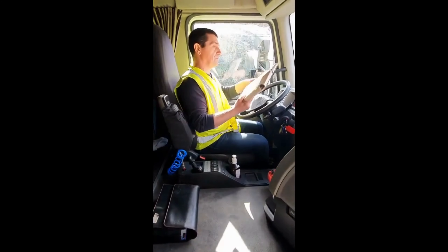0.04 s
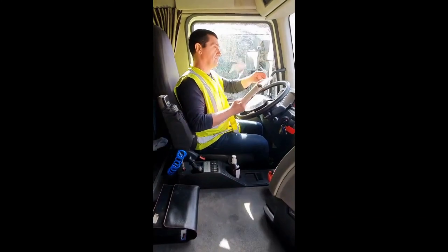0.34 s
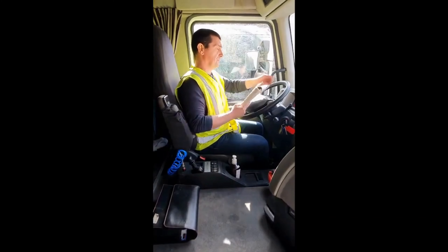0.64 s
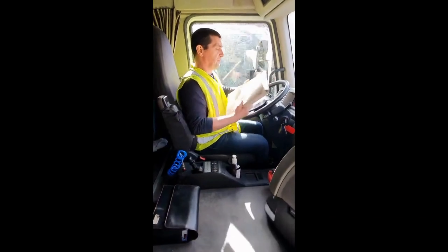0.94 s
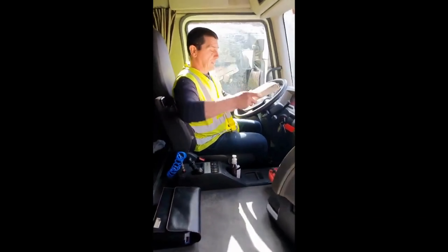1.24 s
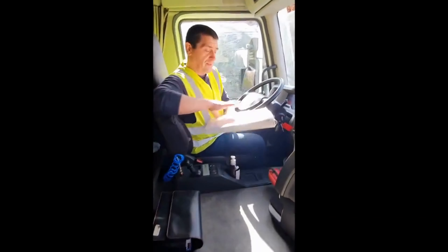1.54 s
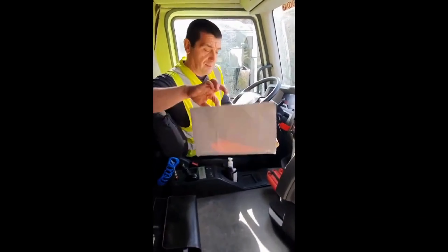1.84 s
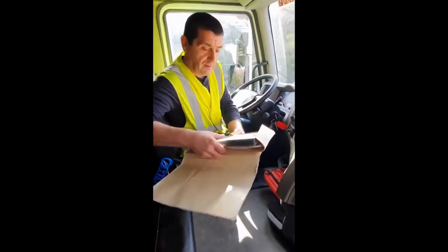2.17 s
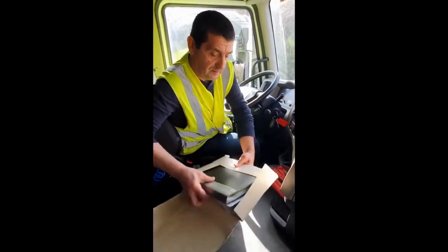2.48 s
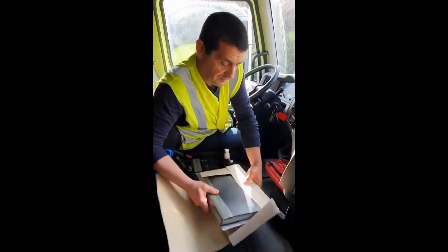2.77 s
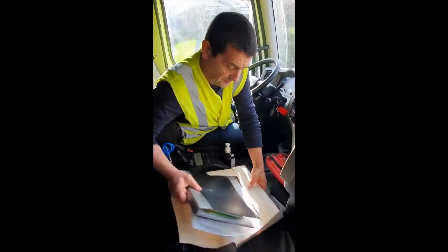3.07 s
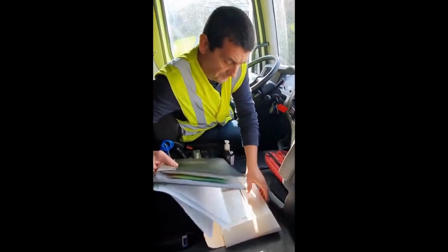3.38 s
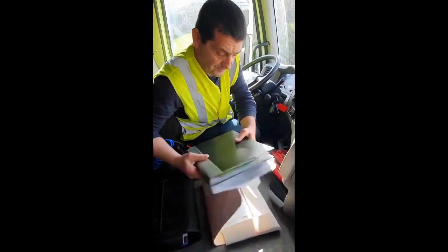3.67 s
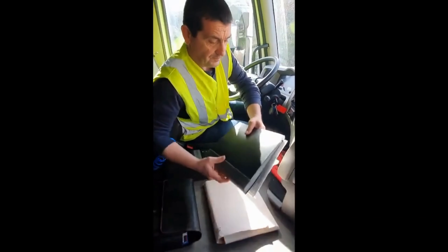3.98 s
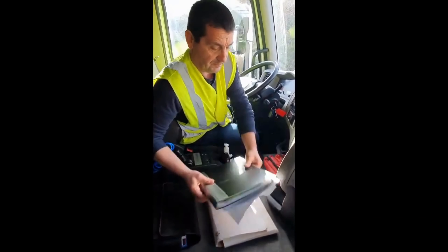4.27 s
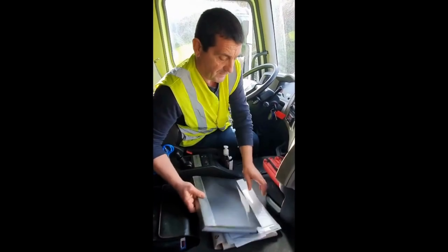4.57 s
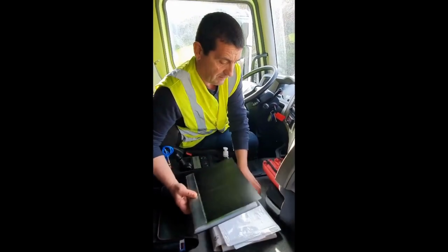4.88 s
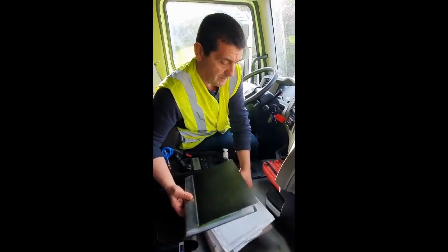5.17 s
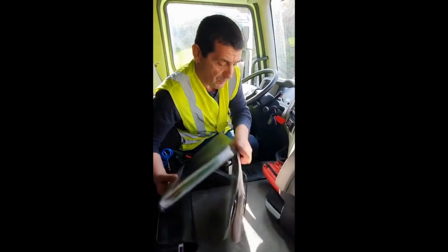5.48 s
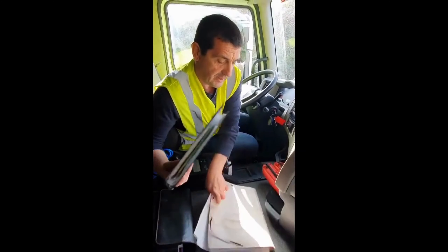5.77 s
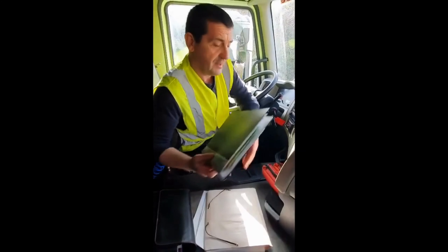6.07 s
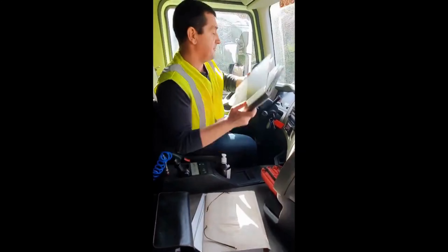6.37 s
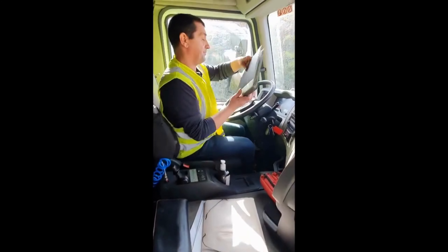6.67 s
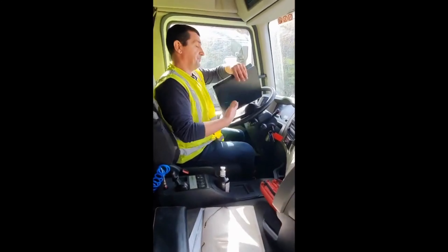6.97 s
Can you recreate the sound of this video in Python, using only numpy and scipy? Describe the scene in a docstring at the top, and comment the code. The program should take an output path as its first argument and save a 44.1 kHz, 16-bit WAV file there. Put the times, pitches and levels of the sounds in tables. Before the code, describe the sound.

Close handling of document folders in a quiet cab: paper rasps and flaps, plastic crackles, and covers slap down.

```python
"""Document folders of card, paper and plastic are handled in a parked truck cab. A card wallet is
unfolded, a binder is drawn out, the wallet is slapped down and the binder knocks the steering wheel.
Stick-slip friction makes the sheets rasp as they slide and flap, buckling makes the sleeves snap,
and impacts set covers and fittings ringing in their modes. Each swing of a folder displaces air
and stirs the low boom of the small, padded cab."""
import sys
import numpy as np
from scipy import signal
from scipy.fft import rfft, irfft, next_fast_len
from scipy.io import wavfile
from scipy.ndimage import uniform_filter1d, map_coordinates

SR = 44100
rng = np.random.default_rng(int(sys.argv[2]) if len(sys.argv) > 2 else 0)


def generate_wav(signal):
    """Clip the signal to [-1, 1] and save it as 16-bit WAV at the path in sys.argv[1]."""
    frames = np.transpose(np.atleast_2d(signal))
    scaled = np.clip(frames, -1, 1) * 32767
    pcm = np.round(scaled).astype(np.int16)
    wavfile.write(sys.argv[1], SR, pcm)


N = 318819
TIME = np.arange(N) / SR


def amp(db):
    """Decibels to gain."""
    return 10 ** (np.asarray(db) / 20)


def unit(x):
    """x at rms 1."""
    return x / np.sqrt(np.mean(x ** 2) + 1e-20)


def along(points, hz):
    """Interpolate (Hz, value) points on a log axis."""
    f, v = np.transpose(points)
    return np.interp(np.log(hz + 1), np.log(f + 1), v)


def curve(points):
    """Interpolate (seconds, value) points at every sample."""
    return np.interp(TIME, *np.transpose(points))


def wobble(rate):
    """A smooth random curve, rate knots a second."""
    return map_coordinates(rng.standard_normal(16384), [TIME * rate], mode="wrap")


def noise(length=N):
    """Two independent white noises."""
    return rng.standard_normal((2, length))


def filtered(x, response):
    """Multiply the spectrum of x by a frequency response."""
    size = next_fast_len(N + SR // 4)
    return irfft(rfft(x, size) * response(np.fft.rfftfreq(size, 1 / SR)), size)[..., :N]


# Each row: frequency in Hz, left-right correlation.
COHERENCE = [(100, 0.92), (300, 0.87), (650, 0.66), (1300, 0.3), (3200, 0.076), (5200, 0.12), (7000, 0.95),
             (15000, 0.91)]
def stereo(pair, spectrum):
    """Partial coherence: two signals are coloured and mixed, alike in the bass and the high treble."""
    angle = lambda hz: np.arccos(np.clip(along(COHERENCE, hz), -1, 1)) / 2
    mid, side = filtered(pair, lambda hz: amp(along(spectrum, hz)) * [np.cos(angle(hz)),
                                                                      np.sin(angle(hz))])
    return np.array([mid + side, mid - side])


# Each row: frequency in Hz, relative spectral density in dB.
BOOM_SPECTRUM = [(12, -53), (20, -32), (27, -33), (38, -2), (91, 5), (100, -8), (118, -7.5), (161, -22.5),
                 (300, -24.5), (390, -50), (660, -120)]
HUSH_SPECTRUM = [(100, -10), (200, 3.5), (400, 1), (800, -6.5), (3500, -1), (6000, -5), (15000, -21)]
# Each row: time of the peak in seconds, level in dB, half-length in seconds.
FOLDER_SWINGS = [(0, -51, 0.051), (0.756, -49, 0.025), (1.786, -46.5, 0.068), (2.27, -41, 0.098),
                 (3.24, -50, 0.21), (4.123, -52, 0.16), (4.42, -46.5, 0.061), (4.86, -43, 0.063),
                 (5.37, -50, 0.053), (5.862, -38, 0.078), (6.42, -43, 0.12), (7.05, -45, 0.077),
                 (7.22, -44, 0.029)]
def cab_air(idle_db=-57, hush_db=-76.5):
    """Air displacement: each swing of a folder swells the cab's low boom, over a faint hush."""
    swells = sum(amp(db) ** 2 * np.exp(-((TIME - s) / half) ** 2) for s, db, half in FOLDER_SWINGS)
    boom = unit(stereo(noise(), BOOM_SPECTRUM))
    hush = unit(stereo(noise(), HUSH_SPECTRUM))
    return np.sqrt(amp(idle_db) ** 2 + swells) * amp(2.1 * wobble(9)) * boom + amp(hush_db) * hush


# Each row: frequency in Hz, time to decay by 60 dB (t60) in seconds.
CAB_DECAY = [(100, 0.16), (500, 0.17), (3000, 0.11), (12000, 0.042)]
def cab_echo(x):
    """Reverberation: glass and dashboard reflect the sound at once, and the seats soon absorb it."""
    hz, t, bands = signal.stft(noise(SR // 3), SR, nperseg=256)
    tail = signal.istft(bands * amp(-60 * t / along(CAB_DECAY, hz)[:, None]), SR, nperseg=256)[1]
    tail = np.pad(tail, ((0, 0), (SR // 300, 0)))
    return signal.fftconvolve(x, tail / np.linalg.norm(tail[0]), axes=1)[:, :N]


# Each row: frequency in Hz, left minus right in dB for sheets at the wheel, then at the console.
BALANCE = [(250, -2, -1.5), (600, 1, 5), (2520, 0.5, 2.5), (4170, 2, 10.5), (6500, 0.5, 3), (8650, -2, -9),
           (10000, 0, 1.5), (11600, -1.5, -12), (14500, -1, 3.5)]
# Each row: frequency in Hz, phase lead of the left port in radians.
PHASE_LEAD = [(100, 0), (600, 0.7), (1200, 1.23), (2200, 3), (4500, 3), (5600, 0.9), (6500, 0)]
# Each row: time in seconds, position from 0 at the wheel to 1 at the console.
FOLDER_PATH = [(1.9, 0), (2.8, 0.82), (5.9, 0.86), (7.2, 0.93)]
def microphone_ports(x):
    """Localisation by phase and level: the left port leads, and the balance follows the folders."""
    sides, balance = np.array([[.5], [-.5]]), np.array(BALANCE)
    phase = lambda hz: np.exp(1j * sides * along(PHASE_LEAD, hz))
    heard = lambda points: filtered(x, lambda hz: amp(sides * along(points, hz)) * phase(hz))
    place = curve(FOLDER_PATH)
    return (1 - place) * heard(balance[:, :2]) + place * heard(balance[:, ::2])


# The plastic console and the wheel's rim. Each row: frequency in Hz, relative dB, free t60 in seconds.
CONSOLE_MODES = [(645, 7.5, 0.12), (775, 3, 0.18), (1090, -32, 0.14), (1140, -17, 0.14), (1286, -15, 0.31),
                 (1374, -4, 0.15), (1575, -5, 0.061)]
WHEEL_MODES = [(604, 7.5, 0.029), (726, 7.5, 0.04), (1770, -9, 0.12), (2310, -14, 0.089)]
def knock(modes, start_s, db, damping_per_s):
    """Damped modal vibration: a fitting is struck once, and the folder on it hastens the decay."""
    out, t = np.zeros(N + SR), np.arange(SR // 4) / SR
    for (hz, mode_db, t60), phase in zip(modes, 2 * np.pi * rng.random(len(modes))):
        envelope = amp(db + mode_db - 60 * t * (1 / t60 + damping_per_s))
        out[round(start_s * SR):][:len(t)] += envelope * np.sin(2 * np.pi * hz * t + phase)
    return out[:N]


def palm_thud(start_s=2.448, db=-19.5, hz=250, rise_s=0.00075, t60=0.012):
    """Heavy damping: the palm stops the binder dead, leaving one low pulse."""
    t = np.maximum(TIME - start_s, 0)
    envelope = amp(db - np.minimum(60 * t / t60, 200)) * (1 - np.exp(-t / rise_s))
    return envelope * np.sin(2 * np.pi * hz * t)


# Each row: multiple of the pitch, relative level in dB.
COVER_MODES = [(1, 1.5), (.74, -6.5), (1.24, -11), (1.82, -16), (2.42, -25.5)]
# Each row: start in seconds, level in dB, pitch in Hz, rise and t60 in seconds.
COVER_BUMPS = [(0.728, -25.5, 174, 0.002, 0.057), (.747, -26, 412, .0018, .045),
               (.889, -50, 2450, .001, 0.021), (0.889, -48.5, 262, 0.0013, 0.044),
               (0.972, -48, 261, .0015, .05), (1.465, -42, 860, .001, .03), (1.73, -40, 217, .003, 0.12),
               (1.752, -41, 700, .0033, .05), (1.794, -44, 1000, .003, .04), (2.345, -44, 805, .003, 0.043),
               (2.479, -33.5, 700, 0.0016, 0.053), (3.031, -34, 640, .003, .05),
               (3.071, -32, 1110, .0017, .035), (3.12, -30, 580, 0.0036, 0.053),
               (3.181, -34.5, 553, .001, 0.048), (3.193, -22, 1800, .0025, .03),
               (3.204, -34, 550, 0.0013, 0.02), (3.27, -29, 728, 0.0024, 0.042),
               (3.314, -27.5, 210, 0.0024, 0.11), (3.35, -28, 253, 0.0047, 0.11),
               (3.374, -27.5, 210, 0.0032, 0.12), (3.449, -38, 140, .003, .09),
               (3.931, -40, 333, 0.0014, 0.039), (4.464, -32.5, 208, 0.0015, 0.085),
               (4.481, -34, 543, .003, 0.053), (4.501, -29, 420, .002, 0.089),
               (4.512, -34.5, 260, .004, 0.12), (4.735, -23, 210, 0.0064, 0.097),
               (4.826, -31.5, 302, 0.0073, 0.1), (4.854, -25, 209, 0.0064, 0.081),
               (4.875, -30.5, 277, 0.0032, 0.11), (5.715, -33, 2700, .001, .023),
               (5.743, -20, 339, 0.0017, 0.1), (5.754, -31, 88, .0027, .1), (6.262, -47, 1130, .0018, .037),
               (6.3, -32.5, 185, 0.0025, 0.072), (6.329, -36.5, 328, 0.0036, 0.079),
               (6.354, -30, 260, 0.0031, 0.13), (6.355, -43, 1024, 0.0031, .04),
               (6.386, -19.5, 71, .0075, .14), (6.43, -36, 277, .0017, 0.08),
               (6.621, -44, 606, .003, 0.059), (6.711, -38.5, 577, 0.0028, 0.068),
               (6.997, -13.5, 317, 0.0017, 0.06), (7.019, -30, 247, .008, .08),
               (7.211, -29.5, 280, 0.0047, 0.11)]
def cover_bumps(flex_share=0.13, softness_db_per_s=897):
    """Bending modes: a bumped cover rings, its pitch wandering as it flexes."""
    out, t = np.zeros(N + SR), np.arange(SR // 3) / SR
    multiple, mode_db = np.transpose(COVER_MODES)
    loss_rate = softness_db_per_s * (np.arange(len(multiple)) > 0)  # slow contact favours the main mode
    bend = np.pad(1 + flex_share * wobble(170), (0, SR), mode="edge")
    for s, db, hz, rise, t60 in COVER_BUMPS:
        grip_db = rng.standard_normal(len(multiple))
        cycles = hz * np.cumsum(bend[round(s * SR):][:len(t)]) / SR
        ring = amp(mode_db + grip_db - loss_rate * rise) @ np.sin(2 * np.pi * np.outer(multiple, cycles))
        envelope = amp(db - 60 * t / t60) * (1 - np.exp(-(t / rise) ** 2))
        out[round(s * SR):][:len(t)] += envelope * ring
    return out[:N]


def swell(t, rise, t60):
    """Exponential growth to 1 at t = 0, then exponential decay."""
    return np.exp(np.minimum(t, 0) / rise) * amp(-60 * np.maximum(t, 0) / t60)


# Each row: peak time in seconds, level in dB, centre and half-width in Hz, rise and t60 in seconds.
EDGE_DRAGS = [(3.03, -38.5, 3260, 120, .012, .1), (3.074, -31.5, 1560, 450, .002, .06),
              (3.198, -35, 1840, 200, 0.0034, .05), (3.521, -55, 3750, 603, 0.033, .35),
              (3.672, -27, 3710, 560, 0.0038, 0.17), (3.745, -38, 3050, 600, .02, .16),
              (3.96, -23.5, 3650, 654, 0.0068, 0.087), (4.658, -48.5, 2650, 330, .001, .04),
              (4.672, -51, 4440, 706, .006, 0.076), (4.941, -67, 4200, 450, 0.064, 0.38),
              (7.12, -46, 2900, 400, 0.011, .08)]
def edge_drags(chatter_db=1.5):
    """Forced resonance: an edge catches and slips, driving one band set by the sheet's free length."""
    out, t = np.zeros((2, N + SR)), np.arange(-SR // 8, SR // 4) / SR
    grid = np.fft.rfftfreq(len(t), 1 / SR)
    for s, db, hz, width_hz, rise, t60 in EDGE_DRAGS:
        ring = unit(irfft(rfft(noise(len(t))) / (1 + ((grid - hz) / width_hz) ** 2), len(t)))
        out[:, round((s + t[0]) * SR):][:, :len(t)] += amp(db) * swell(t, rise, t60) * ring
    return out[:, :N] * amp(chatter_db * wobble(400))


# The arms hold still. Each row: start and end in seconds.
ARM_RESTS = [(0.8, 0.95), (4.66, 4.82)]
def sleeve_rub(start_s=0.92, band_db=(-75, -69, -74.5), rest_db=-6):
    """Cloth friction follows the arms' uneven motion; gives board, scrape and fizz gains."""
    resting = sum(1.0 * ((TIME > start) & (TIME < end)) for start, end in ARM_RESTS)
    motion_db = 3.8 * wobble(8) + rest_db * uniform_filter1d(resting, size=2000)
    return amp(band_db)[:, None] * amp(motion_db) * (TIME > start_s)


# Each row: frequency in Hz, relative spectral density in dB.
WALLET_SPECTRUM = [(1500, -17), (2300, -12), (2680, -12), (3100, -10.5), (3900, -12.5), (6000, -25.5)]
# Each row: time in seconds, resonance in Hz.
WALLET_RESONANCE = [(1.1, 2580), (1.45, 2680), (1.8, 3024), (2.05, 2807)]
# Each row: time in seconds, envelope level in dB.
RASP_ENVELOPE = [(.9, -110), (1.12, -61), (1.33, -47), (1.5, -51), (1.65, -55.5), (1.85, -50), (2.0, -44),
                 (2.15, -45), (2.3, -100)]
def wallet_rasp(half_width_hz=290, rub_db=-2.5, ring_db=-4.5):
    """Frictional excitation: a hand rubs the wallet, whose resonance shifts as the card bends."""
    rub = unit(stereo(noise(), WALLET_SPECTRUM))
    drive = unit(filtered(noise(), lambda hz: 1 / (1 + (hz / half_width_hz) ** 2)))
    ring = unit(drive * np.sin(2 * np.pi * np.cumsum(curve(WALLET_RESONANCE)) / SR))
    return amp(curve(RASP_ENVELOPE)) * (amp(rub_db) * rub + amp(ring_db) * ring)


def friction(spectrum, slips_per_s, slip_db, slip_t60, flex_db):
    """Stick-slip noise of a flexing sheet in three bands: low board, middle scrape and high fizz."""
    slips = (rng.random(N) < slips_per_s / SR) * rng.exponential(size=N)
    t = np.arange(SR // 40) / SR
    energy = np.abs(signal.fftconvolve(slips, amp(-60 * t / slip_t60) ** 2)[:N])
    crackle = np.sqrt(energy) * noise()
    bands = signal.stft(noise() + amp(slip_db) * unit(crackle), nperseg=1024)[2]
    flex = uniform_filter1d(rng.standard_normal(bands.shape[1:]), size=5, axis=0)
    flex = uniform_filter1d(flex, size=4, axis=1)  # resonances shift as the sheet bends
    rub = signal.istft(bands * amp(flex_db * unit(flex)), nperseg=1024)[1][:, :N]
    sheet = stereo(rub, spectrum)
    below = lambda edge_hz: filtered(sheet, lambda hz: 1 / (1 + (hz / edge_hz) ** 8))
    board = below(edge_hz=1800)
    scrape = below(edge_hz=5720) - board
    return unit(board), unit(scrape), unit(sheet - board - scrape)


# Each row: start and end in seconds, scrape level in dB, board and fizz in dB relative to the scrape.
CARD_STROKES = [(0.392, 0.427, -61, -4, -4), (0.55, 0.72, -62, -18, -1.5), (.84, 1.04, -70, 2, 0),
                (1.084, 1.718, -59, 3.5, -1), (1.764, 2.105, -57, 6, 2), (2.148, 2.363, -48, 2.5, -3),
                (2.45, 2.845, -52.5, -1, -6), (2.606, 2.636, -46, -8, -2.5), (2.822, 2.9, -46, -1, -8),
                (2.887, 3.139, -42.5, -2, -8), (3.16, 3.399, -46, 1, -10), (3.802, 3.88, -63, 6, -9),
                (4.012, 4.34, -47.5, -7, -4), (4.385, 4.402, -43, -9.5, -1.5), (4.85, 4.973, -69, 6, -30),
                (5.011, 5.164, -53, 5, -5.5), (5.248, 5.426, -49.5, -2.5, -8),
                (6.023, 6.22, -62.5, 1.5, -24), (6.236, 6.585, -58.5, -1.5, -7.5),
                (6.653, 6.767, -57, 1.5, -1.5), (6.774, 6.856, -50.5, -9, -4), (6.938, 7.23, -54, 1, -7)]
def stroke_gains(rise_db_per_s=291, fall_db_per_s=168):
    """Incoherent addition: overlapping strokes sum in power; gives board, scrape and fizz gains."""
    power = np.zeros((3, N))
    for start, end, db, board_db, fizz_db in CARD_STROKES:
        fade_db = rise_db_per_s * np.maximum(start - TIME, 0) + fall_db_per_s * np.maximum(TIME - end, 0)
        power += amp([[db + board_db], [db], [db + fizz_db]]) ** 2 * amp(-np.minimum(fade_db, 100)) ** 2
    return np.sqrt(power)


# Each row: frequency in Hz, relative spectral density in dB.
CARD_SPECTRUM = [(71, -38), (120, -10), (213, -0.5), (392, -4.5), (544, -6.5), (1930, -7.5), (2270, -8.5),
                 (3350, -7), (10300, -32), (11900, -26.5), (15800, -39.5)]
def sliding_card(strokes):
    """Sliding friction: card catches unevenly on card and cloth; the stiff board responds most."""
    board_gain, scrape_gain, fizz_gain = np.hypot(strokes, sleeve_rub())
    board, scrape, fizz = friction(CARD_SPECTRUM, slips_per_s=600, slip_db=-5, slip_t60=.004, flex_db=3.5)
    catch = amp(1.1 * wobble(45) + 0.54 * wobble(170))
    surface = scrape_gain * scrape + wallet_rasp() + fizz_gain * fizz
    return catch ** 2 * board_gain * board + catch * surface


# Each row: time in seconds, level in dB.
SLEEVE_SNAPS = [(.732, -22.5), (3.663, -21.5), (4.106, -31), (4.15, -29.5), (4.233, -37), (4.381, -34),
                (5.049, -28), (5.302, -31), (5.319, -31), (5.366, -38), (5.742, -15), (5.821, -30),
                (5.97, -31.5), (6.655, -48), (6.688, -42)]
# Each row: frequency in Hz, relative spectral density in dB.
SNAP_SPECTRUM = [(300, -22), (1500, -8), (3600, 6), (5200, 0.5), (7500, -4), (10300, -14.5), (11700, -7),
                 (15800, -24)]
def sleeve_snaps(fizz_gain, crinkles_per_s=36, crack_t60=0.0084, ring_db=-17, ring_t60=0.05):
    """Buckling: plastic sleeves give way in sharp snaps, and in tiny random crinkles as they move."""
    size = amp(0.5 + 4 * rng.uniform(-1, 1, N))
    kicks = (rng.random(N) < crinkles_per_s / SR) * size * fizz_gain
    for s, db in SLEEVE_SNAPS:
        kicks[round(s * SR)] = amp(db)
    t = np.arange(SR // 10) / SR
    decay = amp(-60 * t / crack_t60) ** 2 + amp(ring_db - 60 * t / ring_t60) ** 2
    envelope = np.sqrt(np.abs(signal.fftconvolve(kicks ** 2, decay)[:N]))
    return envelope * unit(stereo(noise(), SNAP_SPECTRUM))


# A sheet flips over, except the first row, which is a sharp burst as the sound begins. Each row: peak time in
# seconds, scrape in dB, board and fizz in dB relative to the scrape, the scrape's t60 in seconds.
SHEET_FLAPS = [(.003, -24, -17, -5.5, 0.115), (0.652, -38, -10, -7.5, 0.12), (0.733, -22, -4, -8.5, 0.11),
               (1.054, -49.5, -1.5, -12, 0.088), (1.721, -45, -2, -11, 0.42), (3.272, -40, 4, -6.5, 0.24),
               (3.664, -29, -18.5, -9.5, 0.15), (3.957, -31.5, -18, -6, 0.079), (4.037, -38.5, -9, 1, 0.19),
               (4.468, -39, -1, -11, 0.27), (5.219, -47.5, 1, 3, 0.33), (5.319, -44.5, 8.5, -2, 0.19),
               (5.367, -41, -17, -4, 0.29), (5.571, -41.5, -2.5, -12, 0.2), (5.742, -25, 0, -3.5, 0.1),
               (5.97, -39, 1, -7, .11), (6.997, -31, -1, -17, 0.084)]
# A sheet sweeps the pile. Each row: as for a flap, with the rise in seconds before the t60.
SHEET_SWISHES = [(.775, -33.5, -10, -4.5, 0.024, 0.063), (2.01, -44.5, -3, 3, 0.077, 0.43),
                 (2.965, -48, -7, 1.5, 0.025, 0.16), (3.027, -37.5, -5, -25, 0.027, 0.21),
                 (3.68, -29.5, -9, -5, 0.004, 0.18), (3.738, -33.5, -5.5, -8, 0.026, 0.21),
                 (3.962, -27, -12.5, -6.5, 0.0099, .12), (4.512, -41.5, 1, -8, 0.043, 0.14),
                 (5.052, -40, -1, -5.5, 0.03, 0.25), (5.419, -36.5, 1.5, -7.5, 0.015, 0.16),
                 (5.736, -27, -3.5, -2, 0.0037, 0.06), (5.752, -26, 2.5, -8.5, 0.0056, 0.17),
                 (5.816, -36.5, 1, -4, 0.013, 0.25), (5.872, -30.5, 5, -9.5, 0.023, 0.16),
                 (7.04, -56, -3, -6.5, 0.025, 0.22)]
# A stiff edge taps. Each row: as for a flap, without the fizz.
EDGE_TAPS = [(.087, -50, -6, 0.054), (.371, -58.5, 4.5, 0.18), (0.891, -52.5, -4, .03),
             (1.466, -54, 12, 0.036), (1.796, -54.5, 14, 0.062), (2.45, -62.5, 15, 0.018),
             (2.48, -49, 7, 0.17), (2.539, -37.5, -2.5, 0.1), (2.576, -43, 6, 0.067), (2.843, -48, 9, .04),
             (3.071, -43.5, -6, .06), (3.128, -43.5, 4, 0.057), (3.182, -41, 5, 0.025),
             (3.206, -36, 3, 0.035), (3.792, -39.5, 2.5, 0.015), (3.935, -49, 14, 0.076),
             (4.736, -60, 2, 0.12), (5.717, -39, -5, 0.048), (6.357, -35.5, -4.5, 0.11),
             (6.426, -41.5, -4, 0.094), (6.556, -50, 1.5, 0.072), (6.689, -50.5, -9, 0.089),
             (7.207, -38.5, 2, .12)]
def contacts(strokes, flap_rise=0.0029, tap_rise=0.002, tap_fizz_db=-33,
             creases_per_s=9.8, crease_rise=0.0013, crease_t60=0.047):
    """Transient excitation: lists flaps, swishes, taps and the creases that yield during a stroke."""
    rows = [(s, db + board, db, db + fizz, flap_rise, t60) for s, db, board, fizz, t60 in SHEET_FLAPS]
    rows += [(s, db + board, db, db + fizz, rise, t60) for s, db, board, fizz, rise, t60 in SHEET_SWISHES]
    rows += [(s, db + board, db, db + tap_fizz_db, tap_rise, t60) for s, db, board, t60 in EDGE_TAPS]
    creases = np.flatnonzero(rng.random(N) < creases_per_s / SR)
    crease_db = -9.5 + 7 * rng.uniform(-1, 1, N)  # relative to the stroke
    for i in creases:
        rows.append((i / SR, *(20 * np.log10(strokes[:, i]) + crease_db[i]), crease_rise, crease_t60))
    return rows


# Paper and plastic. Each row: frequency in Hz, relative spectral density in dB.
SHEET_SPECTRUM = [(71, -35), (120, -7), (217, -1.5), (522, -10), (785, -2.5), (1850, -5), (4020, -5),
                  (4930, -14), (6570, -14), (10300, -28), (11600, -21.5), (15800, -35)]
def flapping_sheets(strokes):
    """Distributed impact: an edge meets first, the contact spreads to a peak, and the sheets settle."""
    board, scrape, fizz = friction(SHEET_SPECTRUM, slips_per_s=1800, slip_db=-1.5,
                                   slip_t60=0.0039, flex_db=3)
    power = np.zeros((3, N))
    linger = np.array([[.9], [1], [1.15]])  # the fizz decays most slowly
    for s, board_db, scrape_db, fizz_db, rise, t60 in contacts(strokes):
        span = np.arange(max(int(s * SR) - SR // 8, 0), min(int(s * SR) + SR // 2, N))
        envelope = swell(span / SR - s, rise, t60 * linger)
        power[:, span] += (amp([[board_db], [scrape_db], [fizz_db]]) * envelope) ** 2
    board_gain, scrape_gain, fizz_gain = np.sqrt(power)
    chatter = amp(0.68 * wobble(240))
    snaps = sleeve_snaps(np.hypot(fizz_gain, strokes[2]))
    return chatter * (board_gain * board + scrape_gain * scrape) + fizz_gain * fizz + snaps


def scene():
    """Superposition: the folders a little to the left, their reflections and the cab's air."""
    strokes = stroke_gains()
    console = knock(CONSOLE_MODES, start_s=5.742, db=-24, damping_per_s=2.1)
    wheel = knock(WHEEL_MODES, start_s=6.998, db=-30, damping_per_s=3)
    sheets = sliding_card(strokes) + flapping_sheets(strokes) + edge_drags()
    folders = microphone_ports(sheets + cover_bumps() + palm_thud() + console + wheel)
    return folders + amp(-13.5) * cab_echo(folders) + cab_air()


def record(dry):
    """Band limiting: an ideal low-pass filter removes the highest treble."""
    return filtered(dry, lambda hz: hz < 15850)


dry = scene()
out = record(dry)
generate_wav(out)
```